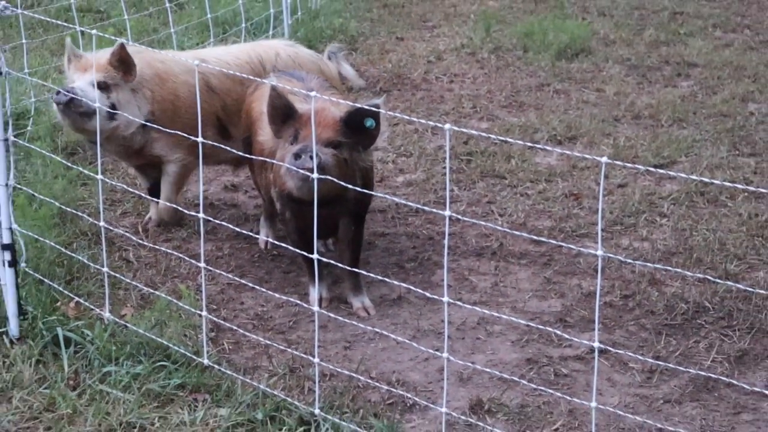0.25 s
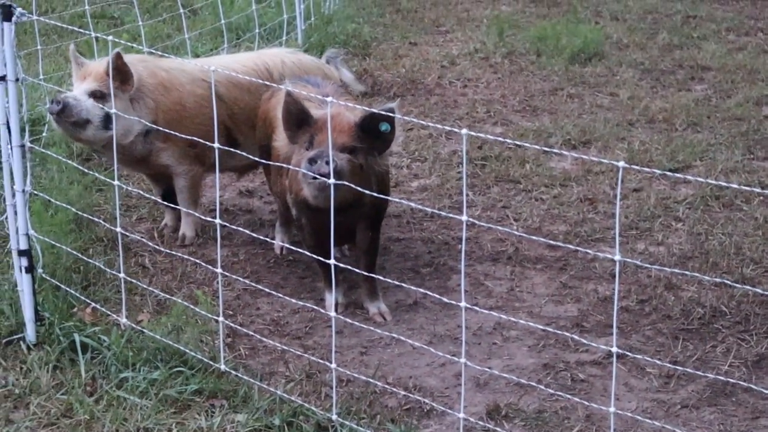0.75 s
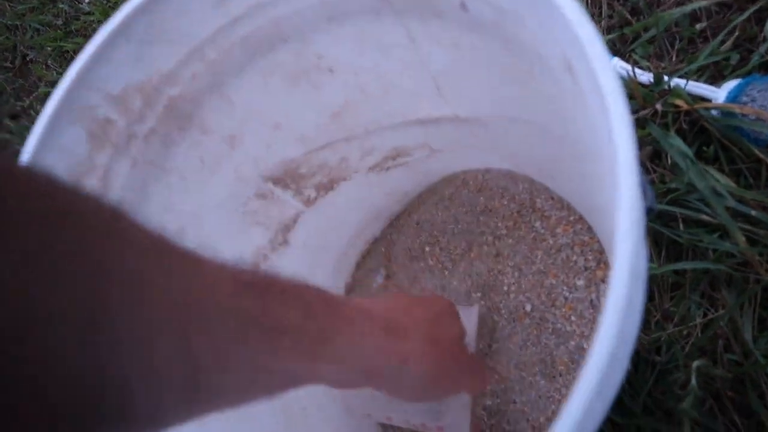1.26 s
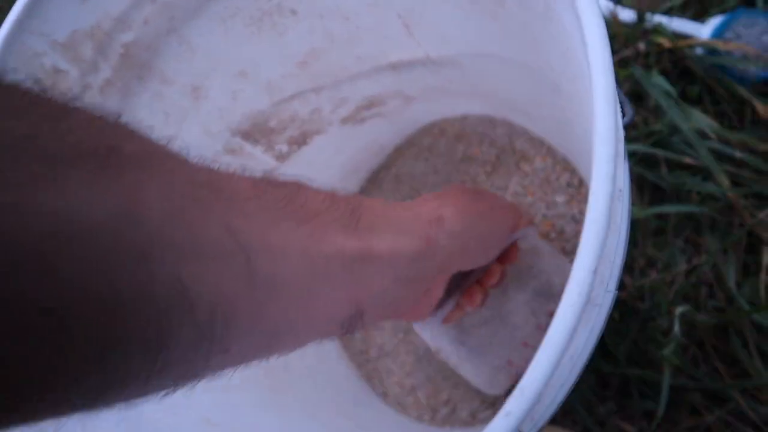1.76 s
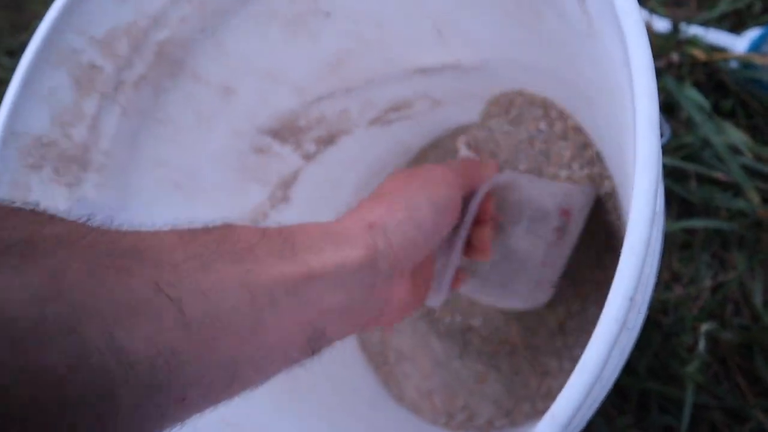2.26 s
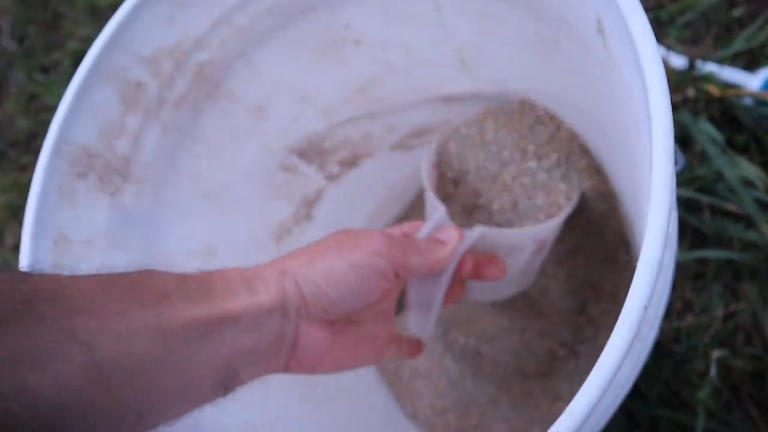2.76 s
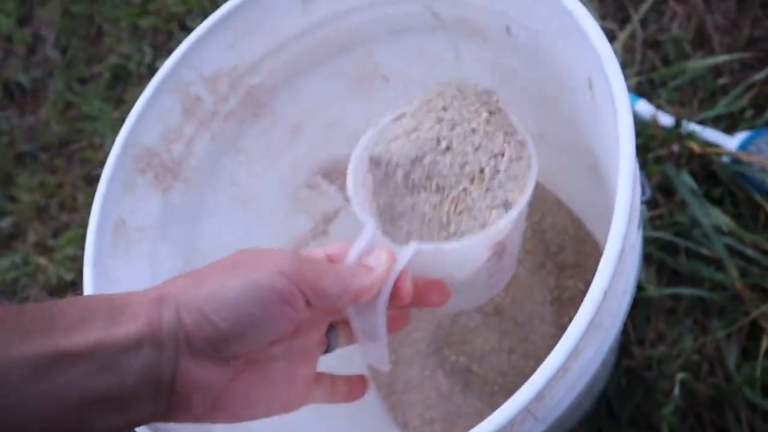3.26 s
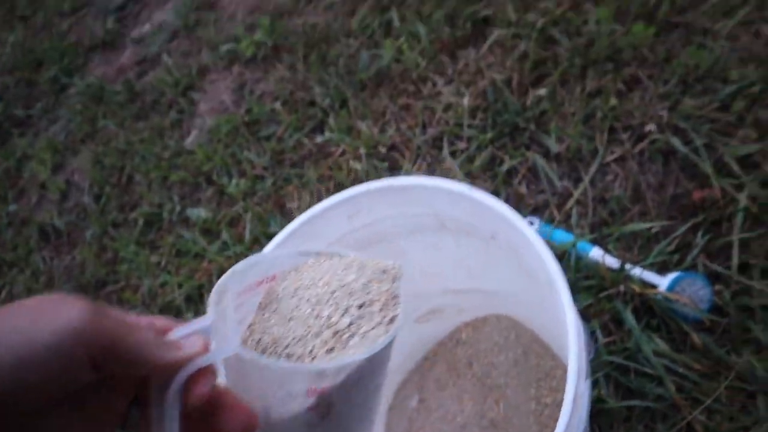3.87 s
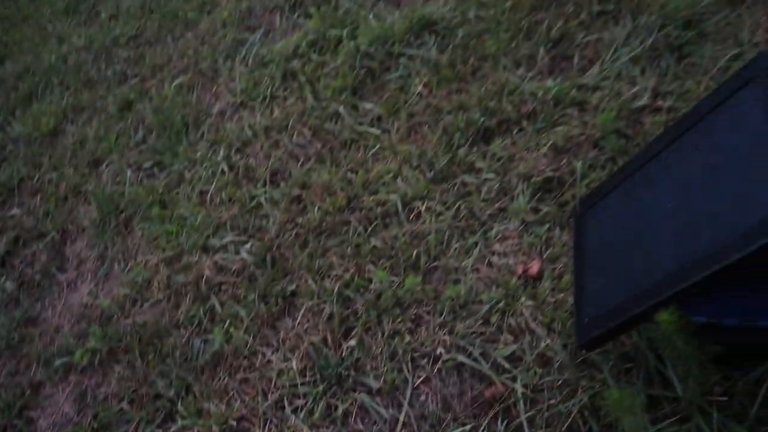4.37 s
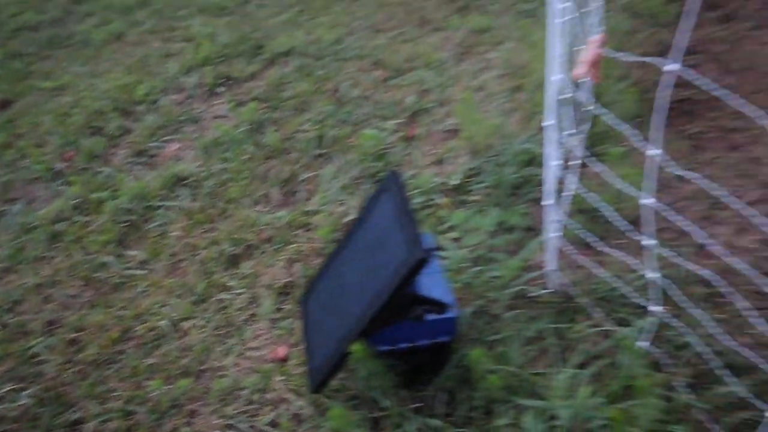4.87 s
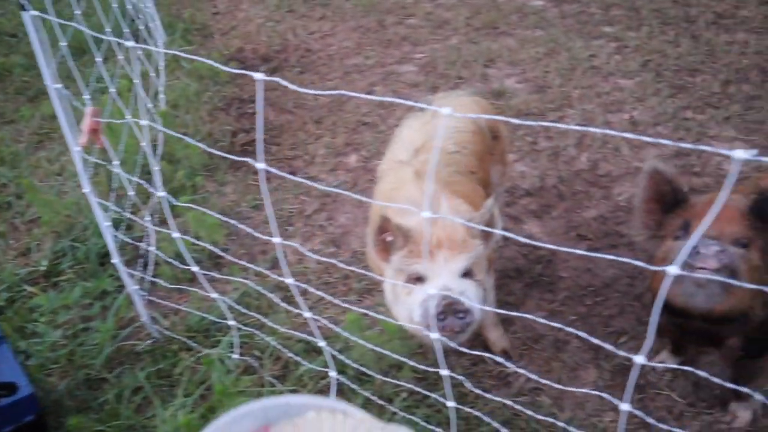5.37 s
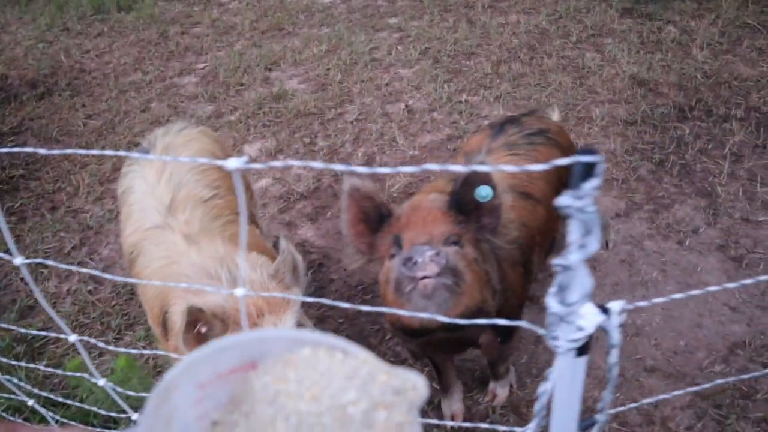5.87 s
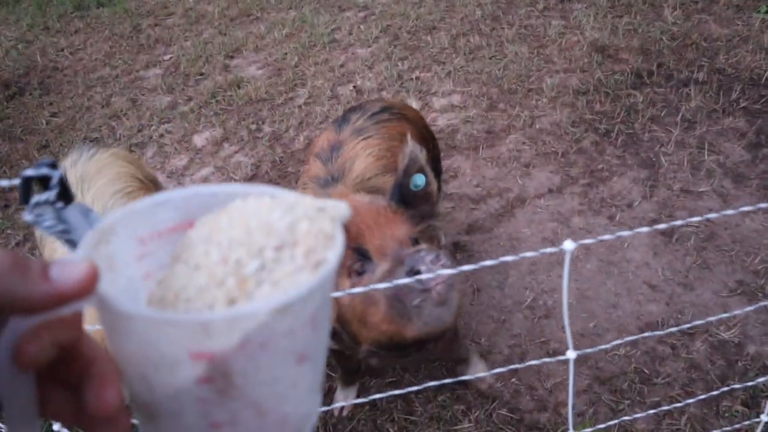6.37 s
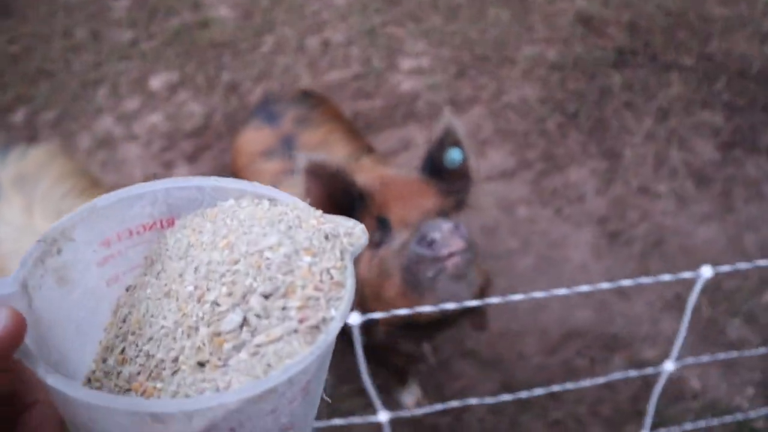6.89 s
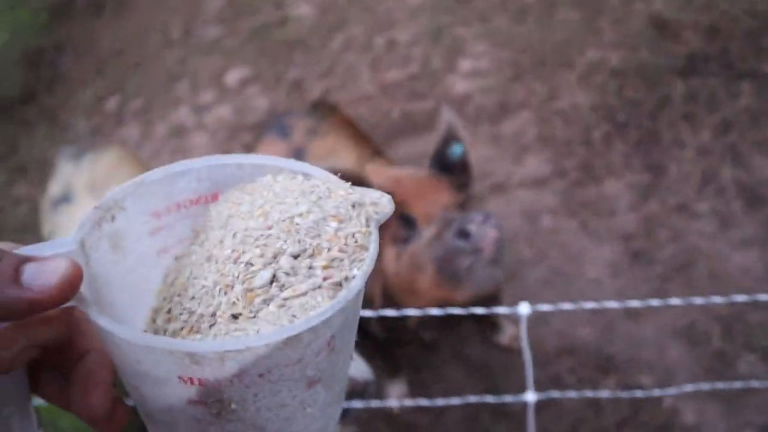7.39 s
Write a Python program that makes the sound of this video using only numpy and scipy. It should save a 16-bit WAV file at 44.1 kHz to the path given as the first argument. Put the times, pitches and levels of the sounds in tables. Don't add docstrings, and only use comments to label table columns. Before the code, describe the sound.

A pig squeals roughly, then a scoop digs through grain in a plastic bucket with knocks, before close snorting grunts repeat in a breezy field.

```python
import sys
import numpy as np
from scipy import signal
from scipy.fft import rfft, irfft, next_fast_len
from scipy.io import wavfile
from scipy.ndimage import uniform_filter1d, map_coordinates

SR = 44100
rng = np.random.default_rng(int(sys.argv[2]) if len(sys.argv) > 2 else 0)


def int16_out(signal):
    q = np.round(np.clip(np.atleast_2d(signal).T, -1, 1) * 32767)
    wavfile.write(sys.argv[1], SR, q.astype(np.int16))


def field_ratio(decibels):
    return 10 ** (np.asarray(decibels, dtype=float) / 20)


N = 336483
TIME = np.arange(N) / SR


def unit(x):
    return x / np.sqrt(np.mean(x ** 2) + 1e-20)


def peak(x):
    return x / np.abs(x).max()


def noise(count=N):
    return rng.standard_normal(count)


def curves(rows):
    s, *cols = np.transpose(rows)
    return [np.interp(TIME, s, c) for c in cols]


def within(rows, fade=0.023):
    since_start = TIME - rows[0][0] + fade
    until_end = rows[-1][0] + fade - TIME
    return np.clip(np.minimum(since_start, until_end) / fade, 0, 1)


def wobble(rate, count=N):
    grid = TIME[:count:8]
    knots = noise(int(count * rate / SR) + 4)
    return np.interp(TIME[:count], grid, map_coordinates(knots, [grid * rate]))


def filtered(x, response):
    m = next_fast_len(len(x) + 8192)
    return irfft(rfft(x, m) * response(np.fft.rfftfreq(m, 1 / SR)), m)[:len(x)]


def modes(peaks):
    def response(f):
        total = 0
        for k, (c, w, db) in enumerate(peaks):
            total = total + (-1) ** k * field_ratio(db) * 1j * f * w / (c * c - f * f + 1j * f * w)
        return total
    return response


def slope(points):
    hz, db = np.transpose(points)
    return lambda f: field_ratio(np.interp(np.log(f + 1), np.log(hz), db))


def grains(rate, spread_db):
    size_db = spread_db * np.minimum(rng.exponential(size=N), 3)
    return (rng.random(N) < rate / SR) * noise() * field_ratio(size_db)


def add(x, s, sound, lead=0):
    i = round(s * SR) - lead
    x[i:i + len(sound)] += sound[:len(x) - i]


def swells(rows, rise, fall, more_db=0):
    grid = TIME[::64]
    start, end, db = np.transpose(rows)[:3, :, None]
    lost_db = rise * np.clip(start - grid, 0, None) + fall * np.clip(grid - end, 0, None)
    gain = field_ratio(db + np.reshape(more_db, (-1, 1)) - lost_db)
    return np.interp(TIME, grid, gain.sum(axis=0))


# t/s, pitch f/Hz, roughness [0-1]
SQUEAL_VOICE = [
    (0, 585, .75),
    (.345, 590, .62),
    (.385, 600, .22),
    (.413, 550, .3),
    (.422, 570, .75),
    (.462, 570, .68),
    (.474, 595, .15),
    (.49, 570, .22),
    (.53, 390, .5),
]
# t/s, level/dB, mouth opening level/dB
SQUEAL_LEVEL = [
    (0, -19.5, -6.5),
    (0.035, -21, -4.5),
    (0.15, -22.5, -7),
    (0.22, -23, -1),
    (0.39, -22.5, 0.5),
    (0.43, -21, -4),
    (0.478, -19.5, 3.5),
    (0.508, -22.5, -8),
    (0.535, -51.5, -1),
]
# f/Hz, width/Hz, level/dB
SQUEAL_THROAT = [(231.2, 126, -1), (588.5, 101, -4), (816.4, 198, -1.5), (1184, 310, -3.5),
                 (1800, 308, 0.5)]
# f/Hz, width/Hz, level/dB
SQUEAL_MOUTH = [(2759, 219, -1), (3960, 463, 0), (4963, 406, -5), (5910, 139, -11.5), (6598, 346, -20),
                (8200, 310, -26.5), (9900, 340, -35.5), (12260, 560, -24)]
# t/s, peak level/dB
SQUEAL_FLAPS = [(0.0014, -12), (0.0214, -7), (0.0364, -10), (0.0444, -9), (0.0624, -10.5), (0.0841, -13),
                (0.1043, -12.5), (0.1205, -7.5), (0.1414, -14), (0.1534, -8), (0.171, -12.5), (0.189, -10),
                (0.1974, -10.5), (0.2104, -8.5), (0.2329, -9.5), (0.2556, -11), (0.2644, -10),
                (0.2824, -11), (0.2998, -10.5), (0.3064, -10), (0.3184, -10), (0.3274, -8.5), (0.3404, -6),
                (0.3514, -8), (0.3654, -9), (0.4194, -8), (0.4374, -6), (0.4524, -8.5)]
FLUTTER_DB_PER_ROUGH, STEADY_ROUGH = 10, .17
FLAP_FADE_S, FLAP_LEAK = .0045, .4
NOSE_HZ, NOSE_WIDTH_HZ = 2420, 350


def squeal():
    hz, rough = curves(SQUEAL_VOICE)
    level_db, mouth_db = curves(SQUEAL_LEVEL)
    phase = 2 * np.pi * np.cumsum(hz * (1 + 0.085 * rough * wobble(200))) / SR
    pulses, sung = np.zeros(N), slice(0, SR)
    for k in range(1, 24):
        pulses[sung] += (1 - min(0.1334 * k, .8) * (k % 2)) * np.sin(k * phase[sung])
    breath = noise() * (1 + np.cos(2 * phase))
    voiced = np.sqrt(1 - .8 * rough) * pulses / pulses[sung].std()
    folds = (voiced + np.sqrt(.8 * rough) * unit(breath)) * within(SQUEAL_LEVEL)

    t = TIME[:SR // 20]
    slap = np.exp(-t / FLAP_FADE_S) * (1 - np.exp(-t / 0.00046))
    slaps = np.zeros(N)
    for s, db in SQUEAL_FLAPS:
        add(slaps, s, field_ratio(.7 * db + 12) * slap)
    leak = np.interp(TIME, [.36, .385, .41, .42, .458, .468], [FLAP_LEAK, .9, .9, FLAP_LEAK, FLAP_LEAK, .9])
    flutter_db = FLUTTER_DB_PER_ROUGH * np.clip(rough - STEADY_ROUGH, 0, 1)
    chop = (leak + slaps) * field_ratio(flutter_db * .5 * wobble(149.88))

    def nose(f):
        return 1 - 0.74 * modes([(NOSE_HZ, NOSE_WIDTH_HZ, 0)])(f)

    def throat(f):
        return modes(SQUEAL_THROAT)(f) ** 2 * nose(f)

    def mouth(f):
        treble = (1j * f / (2500 + 1j * f)) ** 4 / (1 + 1j * f / 5000) ** 4
        return modes(SQUEAL_MOUTH)(f) * nose(f) * treble

    def even(x):
        return x / np.sqrt(np.abs(uniform_filter1d(x ** 2, size=3000)) + 1e-9)

    low = filtered(folds * np.sqrt(chop), throat)
    high = filtered(folds * chop, mouth)
    return field_ratio(level_db) * (even(low) + field_ratio(mouth_db) * even(high)) * within(SQUEAL_LEVEL)


# from t/s, to t/s, level/dB
GUSTS = [(.07, .24, -36), (.6, .7, -40), (.98, 1.5, -35), (1.5, 2.1, -40), (2.45, 2.47, -26.5),
         (3.09, 3.12, -36.5), (3.33, 3.45, -34.5), (3.55, 3.64, -44), (3.9, 4.1, -43), (4.55, 4.6, -37.5),
         (4.8, 5.02, -38.5), (5.45, 5.55, -30), (5.7, 5.76, -39.5), (5.98, 6.04, -27.5), (6.24, 6.3, -27.5),
         (6.44, 6.48, -23), (6.82, 6.88, -34.5), (6.96, 7.0, -26), (7.26, 7.44, -30)]
GUST_RISE, GUST_FALL, BREEZE_DB = 185, 245, -44.5


def wind():
    lumps = noise() * field_ratio(2.7 * wobble(25))
    rumble = slope([(20, -26), (44, -2), (85, -4), (140, -5.5), (220, -16.5), (500, -49.0), (1500, -78)])
    gain = field_ratio(BREEZE_DB) + swells(GUSTS, GUST_RISE, GUST_FALL)
    return gain * unit(filtered(lumps, rumble))


# f/Hz, level/dB per Hz
FIELD = [(59, -26), (100, -22.5), (135, -9), (216, -24.5), (330, -13.5), (4370, -27.5), (4960, -21),
         (5640, -36.5), (14400, -46), (16400, -49)]
# t/s, level/dB
AIR = [
    (0, -38),
    (.86, -57),
    (.9, -49.5),
    (3.4, -54.5),
    (3.75, -49.5),
    (4.6, -50),
    (5.8, -44),
    (6.7, -46),
    (7.63, -50),
]
# t/s, level/dB
CRICKET = [
    [(.5, -52), (.86, -44.5)],
    [(3.4, -60), (4.5, -65), (5.3, -53.5), (5.6, -51.5), (6.7, -47), (7.63, -54)],
]
# t/s, length t/s, start f/Hz, end f/Hz, level/dB
SONGS = [
    (4.134, .03, 2940, 2653, -59),
    (4.751, .04, 2050, 2950, -60),
    (5.045, .02, 3000, 3500, -61.5),
    (4.136, 0.0195, 4185, 3900, -62.5),
    (4.52, .04, 2016, 3000, -65.5),
    (4.657, 0.018, 3444, 3233, -54.5),
    (4.85, 0.18, 1979, 2902, -54),
]
# t/s, level/dB
CHIRPS = [
    (4.359, -56.5),
    (4.589, -58.5),
    (4.82, -56.5),
    (5.039, -55.5),
    (5.255, -58.5),
]
# t/s, level/dB
BUZZES = [
    (4.24, -71.5),
    (4.5, -73.5),
    (4.75, -71),
    (5.27, -79),
]
# t/s, length t/s, level/dB
RASPS = [
    (0.704, 0.166, -58.5),
    (3.666, .38, -68.5),
]
# start f/Hz, end f/Hz, width/Hz
RASP_LINES = [(7550, 7100, 335), (6500, 6070, 200)]
# t/s, length t/s, start f/Hz, end f/Hz, width/Hz, level/dB
DRONE = (4, 0.06, 2174.5, 2130, 39.5, -67)


def field():
    out = field_ratio(curves(AIR)[0] + wobble(6)) * unit(filtered(noise(), slope(FIELD)))

    stroke = 2 * np.pi * 35.29 * TIME + .19 + .15 * wobble(2)
    beat = np.clip(0.64 + 1.3 * np.sin(stroke), .3, 1)
    wing_hz = 5020 + 140 * np.cos(stroke) + 50 * wobble(150)
    wing = np.sin(2 * np.pi * np.cumsum(wing_hz) / SR) * field_ratio(.8 * wobble(60))
    scrape = unit(filtered(noise(), lambda f: modes([(4950, 450, 0)])(f) ** 2))
    trill = unit(beat * (wing + 0.6 * scrape))
    for rows in CRICKET:
        out += trill * field_ratio(curves(rows)[0] - 1.0) * within(rows, fade=0.049)

    calls = [(*row[:4], 15, row[4]) for row in SONGS] + [DRONE]
    calls += [(s, life, *line, db) for s, life, db in RASPS for line in RASP_LINES]
    calls += [(s, .03, 4100, 3250, 120, db) for s, db in CHIRPS]
    calls += [(s, .07, 8000, 8000, 300, db) for s, db in BUZZES]
    for s, life, start_hz, end_hz, width_hz, db in calls:
        u = np.linspace(0, 1, int(life * SR))
        hz = start_hz + (end_hz - start_hz) * u + width_hz * wobble(500, count=len(u))
        shape = np.minimum(1, 8 * np.minimum(u, 1 - u)) * field_ratio(1.9 * wobble(120, count=len(u)))
        add(out, s, field_ratio(db + 5.5) * shape * np.sin(2 * np.pi * np.cumsum(hz) / SR))
    return out


# f/Hz, width/Hz, level/dB
SNOUT = [(632.3, 226.5, 1), (932, 589, -3), (1794.5, 105.8, 3)]
# f/Hz, width/Hz, level/dB
SNOUT_TOP = [(2793, 150, 2.5), (3900, 756, -2.5), (4851, 328, 1.5), (6330, 550, -19.5), (9105, 170, -20.5),
             (13000, 2000, -43)]
# t/s, snap level/dB, boom level/dB
FAR_FLAPS = [(0.5037, -20.5, -23), (.516, -40, -25), (0.5959, -30, -33), (0.6177, -28, -27.5),
             (0.6379, -31.5, -25.5), (0.661, -31, -25), (3.196, -38.5, -42.5), (3.231, -30.5, -36),
             (3.266, -34, -30.5), (3.302, -28.5, -29.5), (3.346, -33.5, -33.5), (3.7897, -39.5, -38.5),
             (3.8244, -34.5, -38.5), (3.8591, -39, -27.5), (4.2984, -47.5, -33), (4.3294, -41.5, -27),
             (4.3597, -44, -31), (4.9059, -46.5, -28), (4.9395, -34.5, -20.5), (4.9697, -24, -18)]
# t/s, snap level/dB, boom level/dB, brightness level/dB, rebound level/dB
NEAR_FLAPS = [(5.4799, -27, -18.5, -35, -6.5), (5.5127, -17, -10.5, -15.5, -7),
              (5.5418, -13, -10.5, -7.5, -16.5), (5.5645, -26.5, -29, 0.23, -9.5),
              (5.927, -36, -26.5, 4.5, -10.5), (5.959, -11.5, -7.5, -2, -8.5), (5.987, -8, -4.5, -4, -7),
              (6.0118, -12, -13.5, 0.05, -9.5), (6.0313, -42.5, -28, 4.5, -12.5),
              (6.3943, -32.5, -20, 0.5, -0.5), (6.422, -17, -7.5, -9, -6), (6.451, -18.5, -5.5, 1, -5),
              (6.4766, -4.5, -8, -6.5, -6.5), (6.5129, -22, -21, -1, -19), (6.836, -36.5, -21.5, 3.5, -10),
              (6.8644, -9.5, -9, 5, -13), (6.8914, -4.5, -9, -3, -5.5), (6.9153, -9, -15.5, -3.5, -7.5),
              (7.2777, -54.5, -30, 3, -16.5), (7.3104, -16, -9.5, -4, -16.5),
              (7.3373, -17, -6.5, 0.5, -4.5), (7.3632, -8, -8, 2.5, -13), (7.3912, -14, -11.5, -8, -19),
              (7.4343, -28, -30, -0.03, -7.5)]
FAR_BRIGHT_DB, FAR_REBOUND_DB = -9.5, -10.5
OVERTONE = 0.0934


def grunts():
    out, lead = np.zeros(N), SR // 40
    t = (np.arange(SR // 10) - lead) / SR
    after = np.clip(t, 0, 1)
    swell = np.where(t < .002, np.exp((t - .002) / 0.002534), np.exp(-(t - .002) / 0.00377))
    flaps = [row + (FAR_BRIGHT_DB, FAR_REBOUND_DB) for row in FAR_FLAPS] + NEAR_FLAPS
    for s, snap_db, boom_db, bright_db, rebound_db in flaps:
        luck = noise(3)
        hz = 300 * (1 + 0.03 * luck[0])
        rebound = field_ratio(rebound_db) * np.exp(-((t - .0145) / 0.00647) ** 2)
        boom = -swell * np.cos(2 * np.pi * hz * (t - .0016))
        boom += rebound * np.sin(2 * np.pi * hz * t + luck[1])
        overtones = np.sin(2 * np.pi * 2.0 * hz * t + luck[2]) + 0.61 * np.sin(2 * np.pi * 2.7 * hz * t)
        boom += OVERTONE * (swell + rebound) * overtones

        fade = np.exp(-after / 0.001028) + 0.04 * np.exp(-after / 0.02)
        crack = (1 - np.exp(-after / 0.000361)) * noise(len(t)) * fade
        crack[lead + 12:lead + 14] += .9
        crack += (t < 0) * 0.0338 * np.exp(-np.abs(t) / 0.0061) * noise(len(t))
        low, top = filtered(crack, modes(SNOUT)), filtered(crack, modes(SNOUT_TOP))
        snap = peak(low) + field_ratio(min(bright_db, 5)) * peak(top)
        add(out, s, field_ratio(boom_db + 6) * boom + field_ratio(snap_db) * snap, lead)
    return out


# start t/s, fullest t/s, end t/s, level/dB
SNORTS = [
    (0.602, 0.635, 0.739, -46),
    (4.88, 4.98, 5.225, -45.5),
    (5.47, 5.58, 5.67, -36),
    (5.93, 6.06, 6.14, -34),
    (6.4, 6.535, 6.585, -29.5),
    (6.86, 6.96, 7.01, -31),
    (7.29, 7.44, 7.495, -36),
    (7.09, 7.14, 7.18, -50.5),
    (5.73, 5.8, 5.93, -50.5),
]
# f/Hz, level/dB per Hz
SNORT_AIR = [(120, -35), (200, -15.5), (305, -1.5), (448, -8.5), (529, -10.5), (623, -9.5), (3310, -20),
             (16000, -44)]


def snorts():
    blow = np.zeros(N)
    for start, full, end, db in SNORTS:
        fading = .3 * full + .7 * end
        blow += field_ratio(db) * np.interp(TIME, [start, full, fading, end], [.2, 1, .5, 0], left=0)
    drops = unit(grains(900, spread_db=2.5))
    air = (noise() + 0.686 * drops) * field_ratio(2.2 * wobble(70) + 0.85 * wobble(25))
    snout = modes(SNOUT[2:] + SNOUT_TOP[:1])
    return blow * unit(filtered(air, lambda f: slope(SNORT_AIR)(f) * (1 + 0.447 * np.abs(snout(f)))))


# t/s, length t/s, level/dB, f/Hz
SCUFFS = [(0.943, 0.0134, -22.5, 2510), (0.994, 0.011, -21, 2200), (1.05, 0.0154, -17.5, 2600),
          (1.102, 0.0177, -19.5, 3200), (1.145, 0.0101, -23, 3010), (2.529, 0.0177, -12, 1800),
          (2.838, .022, -25, 3900), (2.56, .07, -30, 3200), (5.447, .012, -36, 900),
          (5.56, .012, -30, 2200), (5.583, .014, -32, 2400), (4.995, 0.0059, -44.5, 7970),
          (5.051, 0.033, -49.5, 6000), (3.823, 0.0086, -41, 4600), (6.305, .01, -48, 4800),
          (6.32, .006, -48, 2600), (6.369, .008, -44, 3500), (7.115, .014, -56, 7000),
          (7.14, .014, -44, 1500), (.815, .01, -52, 3200)]
# t/s, peak level/dB, f/Hz
THUDS = [(3.099, -30, 154), (3.239, -23, 88.8), (3.354, -14, 81.5), (3.409, -19.5, 59.2),
         (3.444, -21.5, 59), (3.499, -21, 139.7), (3.554, -25, 64.4), (3.597, -20, 144.3),
         (3.689, -23, 156), (6.199, -16, 67.3), (6.254, -11, 53.8), (6.289, -19, 51.1), (6.339, -18.5, 140)]


def handling():
    out = np.zeros(N)
    for s, life, db, hz in SCUFFS:
        u = np.arange(SR // 20) / SR / life
        rub = noise(len(u)) * np.sin(np.pi * np.clip(u, 0, 1) ** 0.79)
        surface = modes([(hz, .9 * hz, 0), (.45 * hz, .4 * hz, -2)])
        add(out, s, field_ratio(db + 7) * filtered(rub, lambda f: surface(f) ** 2))
    t = np.arange(SR // 10) / SR
    for s, db, hz in THUDS:
        push = np.exp(-hz * t / 1.044) * (1 - np.exp(-t / .006))
        add(out, s, field_ratio(db + 2) * np.sin(2 * np.pi * hz * t) * push)
    return out


# t/s, peak level/dB, boom level/dB, f/Hz, time to fade 60 dB t/s
KNOCKS = [(0.978, 4.5, -7, 1354, 0.0286), (1.035, -3.5, -14.5, 1187, 0.0247),
          (0.9554, -14, -42.5, 1750, 0.0274), (1.1616, -12, -41, 1496, .015),
          (1.1674, -9.5, -39, 1300, 0.014), (1.132, -0.84, -42, 1184, 0.04), (1.479, -4, -6, 581, 0.036),
          (1.97, -4.5, -17, 1704, 0.027), (2.451, -6.5, -41.5, 1375, 0.0148),
          (2.485, -16, -44.5, 1310, 0.0193), (2.533, -0.5, -10, 1468, 0.058),
          (2.848, -6.5, -31.5, 1540, 0.054), (2.874, -8.5, -29, 1170, 0.0266),
          (3.557, -23, -44, 1310, 0.0446), (3.729, -26, -49, 1650, 0.083),
          (5.678, -17.5, -52.5, 727, 0.015)]
# t/s, peak level/dB, f/Hz
TICKS = [(0.906, -25, 2560), (0.933, -23.5, 1800), (2.691, -27.5, 1540), (2.709, -21.5, 1330),
         (2.939, -27.5, 1660), (2.977, -21.5, 1650), (3.01, -30, 1570), (3.046, -28.5, 1540),
         (3.082, -26.5, 1500), (3.101, -23.5, 1380), (3.133, -31, 2400), (3.362, -30.5, 1500),
         (3.407, -26.5, 404), (3.52, -34.5, 800), (3.595, -37, 500), (3.65, -38.5, 834), (3.708, -36, 700),
         (1.82, -21, 1200), (1.85, -22.5, 1200), (1.88, -21, 1200), (1.908, -15.5, 1200), (3.495, -33, 830),
         (3.613, -30, 1260), (3.82, -30.5, 400), (3.94, -36, 450), (4.05, -38, 600), (4.08, -40, 1500),
         (4.388, -43, 1500), (4.468, -42, 1800), (4.999, -25.5, 407), (6.2, -26, 708), (6.289, -31, 495),
         (7.087, -31, 413)]
# t/s, peak level/dB
CREAKS = [(1.416, -32.5), (1.4334, -33), (1.4491, -40), (1.4645, -19), (1.497, -19.5), (1.5407, -30.5),
          (1.556, -34.5), (1.571, -27.5), (1.5847, -15), (1.643, -28), (1.671, -28), (1.6004, -32),
          (1.6141, -13.5), (2.4174, -13.5), (2.9174, -42), (3.1744, -41), (3.205, -29.5), (3.4954, -34)]
EDGE_DB, EDGE_GROWS = -28.5, 0.413


def knocks():
    out, t = np.zeros(N), np.arange(SR // 4) / SR
    air_low = np.sin(2 * np.pi * 208 * t) * field_ratio(-60 * t / 0.155)
    air_high = np.sin(2 * np.pi * 285 * t) * field_ratio(-60 * t / 0.07)
    thump = air_low + 0.8 * air_high
    taps = [(s, db, db - 23.5, hz, .03) for s, db, hz in TICKS]
    for s, db, boom_db, hz, t60 in KNOCKS + taps:
        fade = field_ratio(-60 * t / t60) + 0.11 * field_ratio(-15 * t / t60)
        shake = noise(len(t)) * (1 - np.exp(-t / 0.0006)) * fade
        shake[8:16] += 1.1
        wall = filtered(shake, modes([(0.56 * hz, 0.26 * hz, -6), (hz, 0.261 * hz, 0),
                                      (1.826 * hz, .5 * hz, -8)]))
        edge = filtered(noise(len(t)) * field_ratio(-60 * t / (0.19 * t60)), modes([(6000, 2070, 0)]))
        blow = field_ratio(db) * peak(wall) + field_ratio(EDGE_DB + EDGE_GROWS * db) * peak(edge)
        add(out, s, blow + field_ratio(boom_db - 1.0) * thump)
    handle = modes([(750, 500, -3), (3900, 900, 0), (6500, 900, -9)])
    for s, db in CREAKS:
        slip = noise(len(t)) * field_ratio(-60 * t / 0.02)
        add(out, s, field_ratio(db) * peak(filtered(slip, lambda f: handle(f) ** 2)))
    return out


# from t/s, to t/s, strength level/dB, hollow cup level/dB, spilling grain level/dB
STROKES = [(0.948, 0.958, -48, 0.5, -2), (1.023, 1.042, -29.5, -1.5, -36), (1.177, 1.195, -23, -1.5, -19),
           (1.253, 1.522, -32.5, 4.5, -12), (1.689, 1.763, -23.5, -0.43, -17),
           (1.937, 2.024, -25, -9, -15.5), (2.224, 2.296, -21.5, -12.5, -15),
           (2.401, 2.424, -28, -3.5, -10.5), (2.516, 2.545, -21.5, -8, -19.5),
           (2.725, 2.863, -29.5, -13.5, -15), (2.943, 3.118, -39, -28.5, -11),
           (3.14, 3.373, -48, -3.5, -1.5), (3.469, 3.741, -54.5, -6, -3.5)]
STROKE_RISE, STROKE_FALL, SPILL_FALL = 317, 193.7, 138.3
# t/s, level/dB
DRAG = [
    (1.0, -59),
    (1.05, -41),
    (1.6, -33.5),
    (1.72, -28.5),
    (1.9, -25),
    (2.18, -27.5),
    (2.37, -24.5),
    (2.44, -43),
]
CUP_THUMP_DB = -5
DRAG_RATTLE_DB, DRAG_CUP_DB = -16.5, -13
# t/s, share of the higher note [0-1]
CUP_FILLS = [
    (1.14, 0.992),
    (1.3, 0.23),
    (1.45, 0.043),
    (1.65, 0),
    (1.9, 0.44),
]
# t/s, level/dB
LIP = [
    (1.13, -48),
    (1.17, -31),
    (1.3, -35),
    (1.4, -39),
    (1.5, -48),
    (1.6, -58),
]
# f/Hz, level/dB per Hz
RATTLE = [(410, -34.5), (700, -19.5), (1060, -0.5), (1770, 2), (2400, -7), (3090, -8.5), (7000, -32.5),
          (9100, -32), (15400, -120)]
# f/Hz, level/dB per Hz
HISS = [(2350, -23.5), (4000, -10.5), (6260, -13), (14200, -23), (15800, -24.5), (16400, -39)]
DIG_SPAN = [
    (.91,),
    (3.85,),
]


def digging():
    *_, hollow_db, spill_db = np.transpose(STROKES)
    stroke = swells(STROKES, STROKE_RISE, STROKE_FALL)
    cup = swells(STROKES, STROKE_RISE, STROKE_FALL, hollow_db)
    spill = swells(STROKES, STROKE_RISE, SPILL_FALL, spill_db)
    drag = field_ratio(curves(DRAG)[0]) * within(DRAG)

    hail = unit(grains(5000, spread_db=2)) * field_ratio(1.8 * wobble(60))
    plastic = modes([(1650, 200, 0), (3700, 400, -3)])
    rattle = unit(filtered(hail + 1.02 * noise(),
                           lambda f: slope(RATTLE)(f) * (1 + 0.684 * np.abs(plastic(f)))))
    hiss = unit(filtered(1.16 * hail + noise(), slope(HISS)))
    bucket_air = modes([(213, 60, 0), (270, 80, -2.5), (340, 120, -7)])
    boom = unit(filtered(grains(3000, spread_db=1.03), lambda f: bucket_air(f) ** 2))

    def note(hz, width_hz, sharpness=2):
        return unit(filtered(hail + noise(), lambda f: modes([(hz, width_hz, 0)])(f) ** sharpness))

    high = np.clip(curves(CUP_FILLS)[0], 0, 1)
    scoop = np.sqrt(1 - high) * note(514, 222.6) + np.sqrt(high) * note(844.3, 389) + 0.377 * note(673, 734)
    lip = note(3300, 2200, sharpness=3)

    out = (stroke + field_ratio(DRAG_RATTLE_DB) * drag) * rattle
    out += (drag + field_ratio(CUP_THUMP_DB) * cup) * boom
    out += (cup + field_ratio(DRAG_CUP_DB) * drag) * (scoop + field_ratio(-11.5) * lip)
    out += spill * hiss
    out += field_ratio(curves(LIP)[0]) * within(LIP) * lip
    return out * within(DIG_SPAN, fade=0.0045)


# from t/s, to t/s
SILENCE = (.858, .902)


def scene():
    mix = squeal() + wind() + field() + grunts() + snorts() + handling() + knocks() + digging()
    heard = (TIME < SILENCE[0]) | (TIME > SILENCE[1])
    return (mix * heard)[None]


def roll_off(x):
    return signal.sosfilt(signal.butter(12, 16550, fs=SR, output="sos"), x)


def record(dry):
    mix = np.clip(dry, -1, 1)
    return roll_off(mix)


dry = scene()
out = record(dry)
int16_out(out)
```